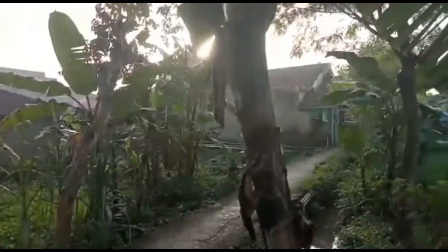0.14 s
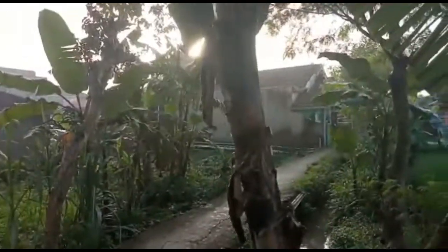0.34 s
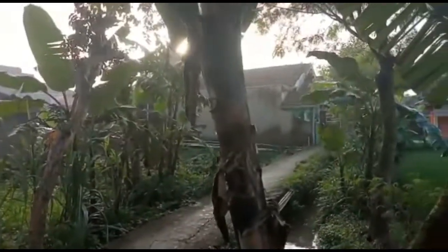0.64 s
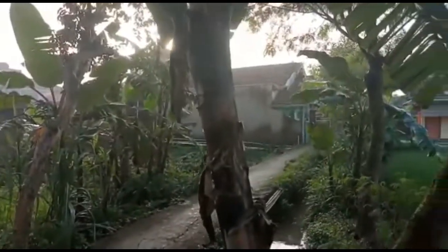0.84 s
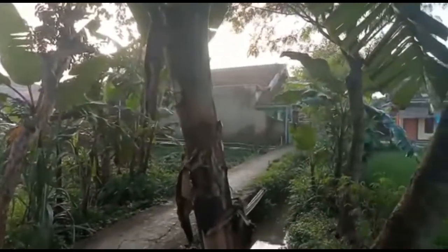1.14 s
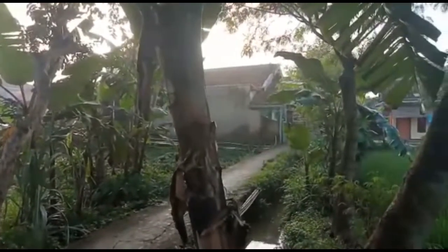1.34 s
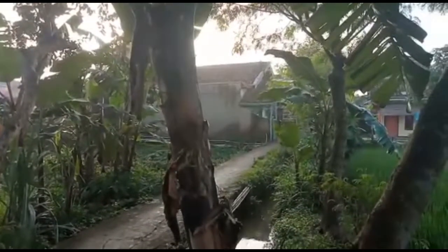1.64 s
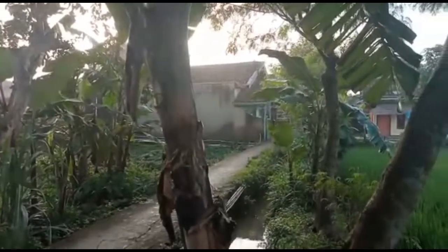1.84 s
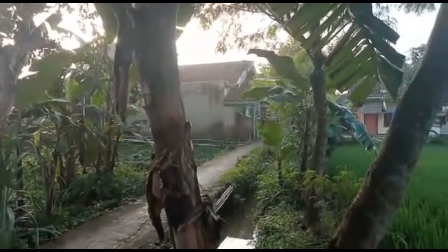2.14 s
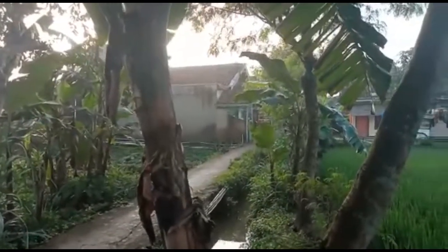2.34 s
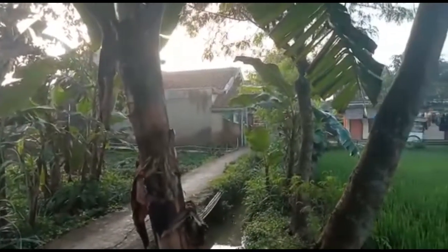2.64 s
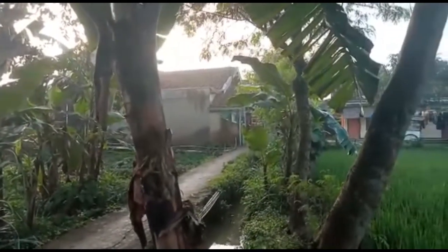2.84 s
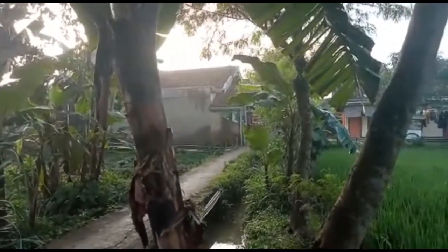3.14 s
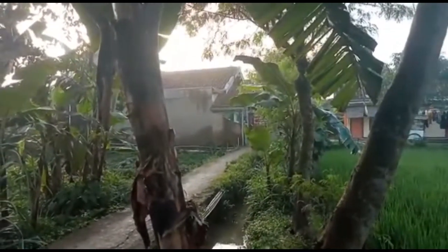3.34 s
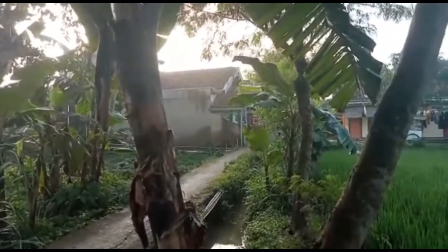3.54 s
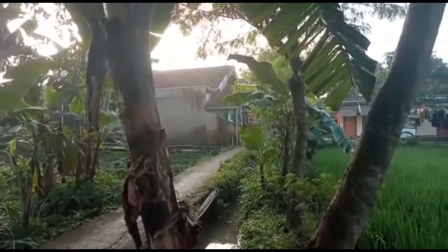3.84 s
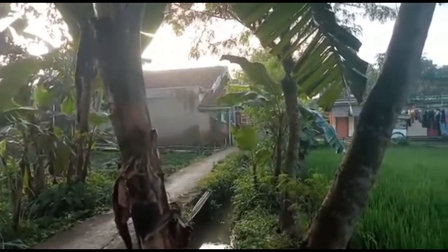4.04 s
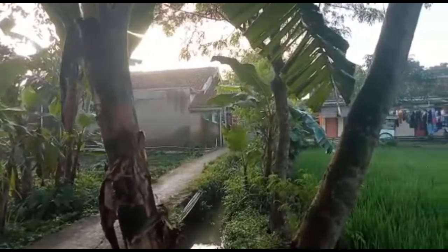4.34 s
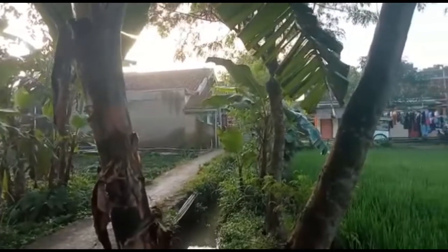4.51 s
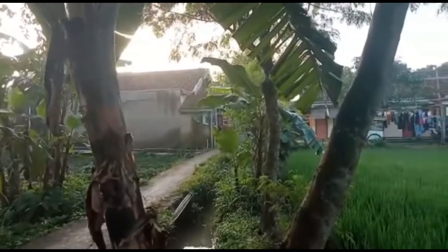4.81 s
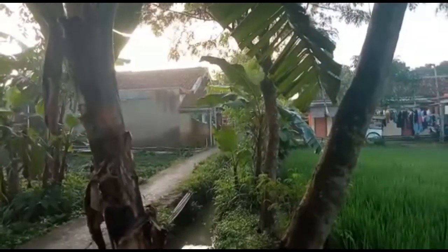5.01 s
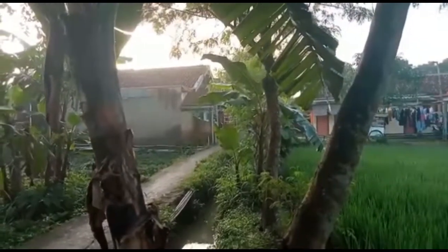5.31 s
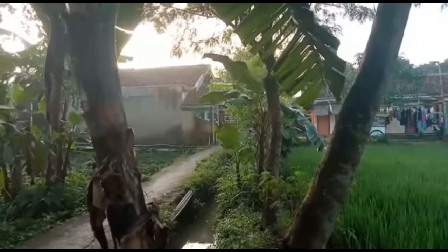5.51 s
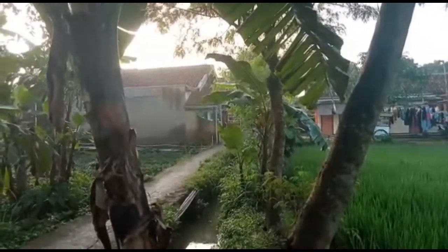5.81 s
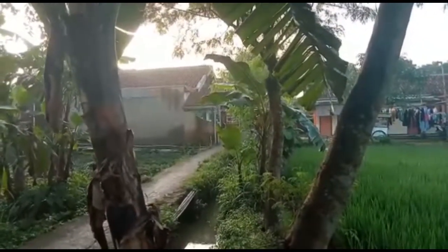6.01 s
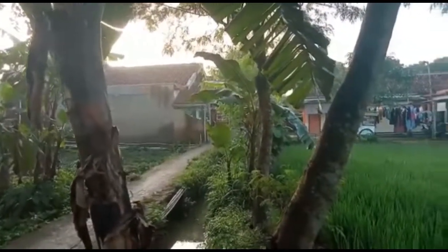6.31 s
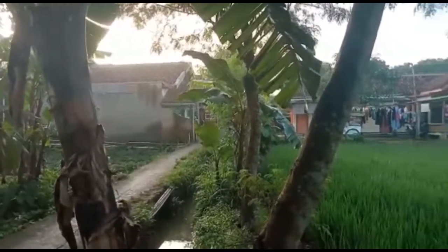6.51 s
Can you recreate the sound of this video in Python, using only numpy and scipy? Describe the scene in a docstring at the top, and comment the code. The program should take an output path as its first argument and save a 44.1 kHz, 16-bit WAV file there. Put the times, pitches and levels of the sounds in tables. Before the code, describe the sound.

A small irrigation ditch beside a rice field rushes continuously over a low step, close to the microphone. The sound is a dense bright churn with fine hiss, ringing little bubbles, low gurgles and a soft rumble underneath. In the first second a distant, hoarse, quavering bird, perhaps a rooster, ends its call. Small drops slap now and then, and the rush eases slightly.

```python
"""An irrigation ditch beside a rice field, where water rushes over a small step.
Patchy noise and swarms of damped sines make the churning sheet, its hiss and its ringing bubbles.
The pool below rumbles with low noise and gurgles with larger bubbles; short slaps add the spatter.
In the first second a distant bird, perhaps a rooster, holds the last notes of its call:
quavering sines with a hoarse flutter, smeared by a decaying noise echo."""
import sys
import numpy as np
from scipy import signal
from scipy.fft import rfft, irfft, next_fast_len
from scipy.io import wavfile
from scipy.ndimage import uniform_filter1d, map_coordinates

SR = 44100
rng = np.random.default_rng(int(sys.argv[2]) if len(sys.argv) > 2 else 0)


def inscribe(sig):
    """Save sig as 16-bit PCM at rate SR to the path in sys.argv[1].

    A 1-D sig is mono; a 2-D sig holds one channel per row.
    Samples are clipped to [-1, 1] before scaling.
    """
    pcm = np.round(np.clip(np.atleast_2d(sig).T, -1, 1) * 32767)
    wavfile.write(sys.argv[1], SR, pcm.astype(np.int16))


N = 293706


def amp(db):
    """Decibels to gain."""
    return 10 ** (np.asarray(db) / 20)


def unit(x):
    """Scale to rms 1."""
    return x / np.sqrt(np.mean(x ** 2) + 1e-20)


def along(points, hz):
    """Read (Hz, value) points on a log frequency axis."""
    point_hz, value = np.transpose(points)
    return np.interp(np.log(hz + 1), np.log(point_hz + 1), value)


def curves(rows):
    """One value per sample for each column after the time in seconds."""
    s, *columns = np.transpose(rows)
    return [np.interp(np.arange(N) / SR, s, column) for column in columns]


def wobble(rate):
    """A smooth random curve at rms 1, with `rate` knots a second."""
    knots = rng.standard_normal(1024)
    position = np.arange(N) * rate / SR
    return unit(map_coordinates(knots, [position], mode="wrap"))


def filtered(x, response):
    """Multiply the spectrum of x by a response of frequency."""
    size = next_fast_len(N + SR // 2)
    hz = np.fft.rfftfreq(size, 1 / SR)
    return irfft(rfft(x, size) * response(hz), size)[:N]


def coloured(x, spectrum):
    """Shape x with a table of (Hz, dB) and bring it to rms 1."""
    return unit(filtered(x, lambda hz: amp(along(spectrum, hz))))


def churn(patchy_db):
    """White noise whose strength drifts in patches of time and pitch, like broken water."""
    noise = signal.stft(rng.standard_normal(N), nperseg=512)[2]
    patches = rng.standard_normal(noise.shape)
    patches = uniform_filter1d(patches, size=7, axis=0)  # smooth across pitch
    patches = uniform_filter1d(patches, size=9, axis=1)  # smooth across time
    return unit(signal.istft(noise * amp(patchy_db * unit(patches)), nperseg=512)[1][:N])


def bubbles(s, gain, hz, cycles, rise, size):
    """Damped sines that decay by 1/e in `cycles`; the pitch climbs as each bubble nears the surface."""
    turns = hz[:, None] * np.arange(size) / SR
    age = turns / cycles
    envelope = np.exp(-age) * (1 - np.exp(-6 * age))
    ring = envelope * np.sin(2 * np.pi * turns * (1 + rise * age / 2))
    where = np.round(np.abs(s) * SR).astype(int)[:, None] + np.arange(size)
    return np.bincount(where.ravel(), (gain[:, None] * ring).ravel(), N)[:N]


def swarm(low_hz, high_hz, cycles, rise, spread_db, count, size):
    """Bubbles at random moments, many faint and a few strong, at rms 1."""
    when, pitch, strength = rng.random((count, 3)).T
    hz = low_hz + (high_hz - low_hz) * pitch
    strength_db = -spread_db * np.log(np.maximum(strength, 1 / 100))
    gain = amp(strength_db) * np.sqrt(hz)
    return unit(bubbles(when * N / SR, gain, hz, cycles, rise, size))


# tone of the churning water: pitch_hz [Hz], level_db [relative dB per Hz]
RUSH_TONE = [(160, -55), (280, -11), (350, -4), (435, -8.5), (530, -7), (900, -5), (1550, -6.5), (2050, 0),
             (3300, -0.25), (3750, -6), (4400, -14), (4950, -26), (6700, -56), (11000, -110)]
# tone of the spray: pitch_hz [Hz], level_db [relative dB per Hz]
SPRAY_TONE = [(3800, -42), (5000, -19), (6200, -16), (6700, -10.5), (7250, -2), (7700, -4.5), (8400, -14.5),
              (9200, -21), (10800, -21.5), (11600, -27), (14000, -28), (15400, -20.5)]
# tone of the finest spray: pitch_hz [Hz], level_db [relative dB per Hz]
MIST_TONE = [(3000, -13), (5000, -1.5), (10000, -0.5), (15000, -3)]
# the rush fades as the microphone turns away from the step: time_s [s], level_db [dB]
RUSH_FADE = [(0, -28), (0.8, -28.5), (1.4, -29.5), (2.5, -30.5), (3.9, -30), (5.3, -31), (5.9, -30.5),
             (6.66, -31.5)]
# the mist dulls as the microphone turns away from the spray: time_s [s], mist_gain_db [dB]
MIST_FACING = [(0, 5), (0.5, 6), (0.8, 4.5), (1.2, 0), (2.3, 2.5), (3, -2), (6.66, 0)]
SWELL_DB, SWELLS_PER_S = 0.37, 14  # the spill swells and slackens at random: rms depth, knots a second
SPRAY_DB, MIST_DB = -43.5, -55.5  # hiss levels before the flow and facing move them
HISS_FOLLOWS = 0.71  # share of each rise and fall of the flow, in dB, that the hiss follows


def stream():
    """Each surge of the flow throws more foam, bubbles and spray."""
    level_db, = curves(RUSH_FADE)
    facing_db, = curves(MIST_FACING)
    flow_db = level_db + SWELL_DB * wobble(SWELLS_PER_S)
    surge_db = 0.58 * wobble(40) + 0.5 * wobble(95)

    fizz = swarm(1415, 5020, cycles=3.7, rise=0.0067, spread_db=2.5, count=11000, size=400)
    tinkle = swarm(1207.0, 4600, cycles=32.3, rise=0.0073, spread_db=2.5, count=2400, size=2400)
    water = coloured(churn(patchy_db=1.3) + amp(-10.5) * fizz + amp(-12.5) * tinkle, RUSH_TONE)

    droplets = swarm(5500, 9000, cycles=30, rise=0.0061, spread_db=3.0, count=3000, size=1200)
    spray = coloured(churn(patchy_db=1.4) + amp(-13) * droplets, SPRAY_TONE)

    prickle = swarm(5260, 16350, cycles=9.6, rise=0.01, spread_db=3.0, count=14000, size=280)
    mist = coloured(churn(patchy_db=3.5) + amp(-2) * prickle, MIST_TONE)

    # the tiniest bubbles are so many that they even out: the hiss follows the flow only in part
    hiss_db = HISS_FOLLOWS * (flow_db - np.mean(flow_db) + surge_db)
    rush = amp(flow_db + surge_db) * water
    hiss = amp(hiss_db + SPRAY_DB) * spray
    return rush + hiss + amp(hiss_db + facing_db + MIST_DB) * mist


# tone of the rumble under the step: pitch_hz [Hz], level_db [relative dB per Hz]
POOL_TONE = [(20, -31), (35, -21), (50, -20), (65, -3.5), (85, -3.5), (135, 4), (170, -4), (205, 1),
             (260, -8.5), (340, -8.5), (500, -33.5)]
# the gurgle comes forward as the microphone turns towards the pool: time_s [s], level_db [dB]
GURGLE_RISE = [(0, -44), (6.66, -42)]
# single large bubbles: start_s [s], level_db [dB, before the ring's envelope], pitch_hz [Hz, at the start]
LARGE_BUBBLES = [(0.094, -23.5, 664), (0.155, -23, 682), (0.157, -19.5, 1210), (0.228, -25.5, 570),
                 (0.424, -26.5, 572), (2.868, -24.5, 935), (2.935, -29.5, 574), (3.510, -22, 1320),
                 (3.555, -23.5, 705), (3.893, -25.5, 827), (3.912, -22, 1260), (4.278, -26.5, 530),
                 (6.222, -29, 518)]


def pool():
    """Air driven under the surface rumbles and gurgles."""
    rumble = coloured(churn(patchy_db=2.0), POOL_TONE) * amp(-47.5 + 1.37 * wobble(16))
    gurgle = swarm(458.4, 1762, cycles=7.3, rise=0.034, spread_db=2.5, count=1900, size=2800)
    gurgle_db, = curves(GURGLE_RISE)
    gurgle = amp(gurgle_db + 2.9 * wobble(16)) * gurgle
    s, db, hz = np.transpose(LARGE_BUBBLES)
    glugs = bubbles(s, amp(db), hz, cycles=4.8, rise=0.026, size=4400)
    return rumble + gurgle + glugs


# the bird's notes: start_s [s], length_s [s], pitch_hz [Hz], level_db [rms dB before the quaver],
# hoarseness [0-1]
BIRD_NOTES = [(0.0, 0.24, 786, -35, 0.78), (0.471, 0.115, 1428, -39, 0.7), (0.567, 0.2, 1450, -31.5, 0.33),
              (0.6, 0.126, 704, -42, 0.94), (0.72, 0.086, 668, -36.5, 0.94)]
# echo decay among house walls and trees: pitch_hz [Hz], t60_s [s]
YARD_DECAY = [(200, .25), (1500, 0.37), (8000, 0.1)]
ECHO_DB = -10.5  # the yard's answer


def bird():
    """Far-off hoarse notes, smeared by yard echoes: noise whose decay time depends on pitch."""
    call = sum(note(*row) for row in BIRD_NOTES)
    hz, t, noise = signal.stft(rng.standard_normal(SR // 2), SR, nperseg=256)
    decay = amp(-60 * t / along(YARD_DECAY, hz)[:, None])
    tail = signal.istft(noise * decay, SR, nperseg=256)[1]
    echo = signal.fftconvolve(call, tail / np.linalg.norm(tail))[:N]
    return call + amp(ECHO_DB) * echo


ATTACK_S, RELEASE_S = 0.0071, 0.05  # of every note
SAG_SHARE = 0.026  # the pitch drops by this share as a note dies
QUAVER_PER_S, QUAVER_DB = 20, 3  # a held note pulses up and down by this many dB
HOARSE_HZ, HOARSE_DB = 40, 2.4  # rms flutter of pitch and level at hoarseness 1


def note(start, length, hz, db, hoarse):
    """One held, quavering sine that sags in pitch as it dies."""
    age = np.arange(N) / SR - start
    opening = np.clip(age / ATTACK_S, 0, 1)
    closing = np.clip((length - age) / RELEASE_S, 0, 1)
    pitch = hz * (1 - SAG_SHARE * (1 - closing)) + hoarse * HOARSE_HZ * wobble(130)
    quaver_db = -QUAVER_DB * np.cos(2 * np.pi * QUAVER_PER_S * age)
    flutter_db = hoarse * HOARSE_DB * wobble(110)
    tone = np.sqrt(2) * np.sin(2 * np.pi * np.cumsum(pitch) / SR)
    return opening * closing * amp(db + flutter_db + quaver_db) * tone


# single splashes: start_s [s], level_db [dB, before envelope and tone], pitch_hz [Hz, at the start]
DROP_SLAPS = [(0.8061, -6, 3220), (1.4291, -13, 2200), (2.3104, -7.5, 2150), (2.3166, -13, 1920),
              (2.5301, -12, 3290), (3.7952, -14, 2680), (5.9388, -14, 2570), (6.3086, -8, 3220),
              (6.6353, -14, 2860)]
SLAP_CYCLES = 2.9  # a slap decays by 1/e in this many cycles
FOAM_DB, FOAM_T60_S = -17, 0.091  # noise burst: level against its slap, decay time


def splashes():
    """Thrown drops slap the surface, each with a short burst of foam; both take the rush's tone."""
    s, db, hz = np.transpose(DROP_SLAPS)
    slap = bubbles(s, amp(db), hz, cycles=SLAP_CYCLES, rise=0.012, size=600)
    kicks = np.bincount(np.round(s * SR).astype(int), amp(db), N)[:N]
    decay = amp(-60 * np.arange(SR // 5) / SR / FOAM_T60_S)
    foam = signal.fftconvolve(kicks, decay)[:N] * rng.standard_normal(N)
    return filtered(slap + amp(FOAM_DB) * foam, lambda hz: amp(along(RUSH_TONE, hz)))


def scene():
    """The ditch close by, the bird far off, mixed to one channel."""
    return (stream() + pool() + bird() + splashes())[None]


TOP_HZ = 15520  # band limit


def record(dry):
    """A sharp cut-off keeps nothing above the band limit."""
    return np.array([filtered(x, lambda hz: hz < TOP_HZ) for x in dry])


dry = scene()
out = record(dry)
inscribe(out)
```